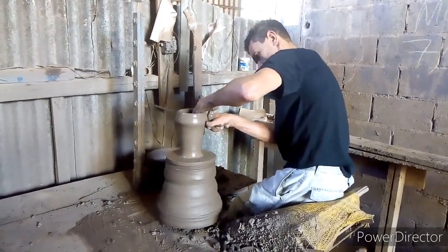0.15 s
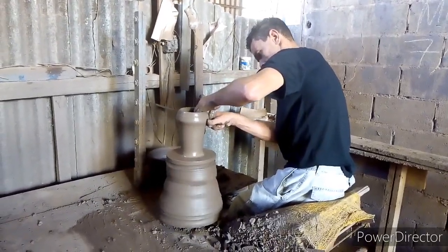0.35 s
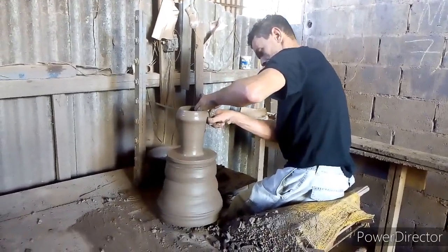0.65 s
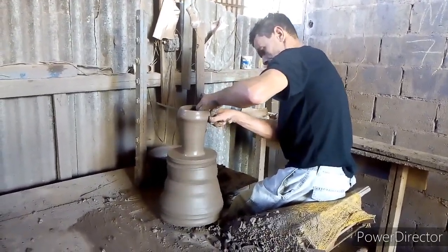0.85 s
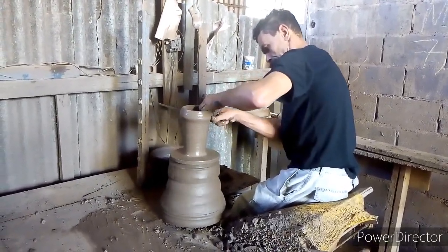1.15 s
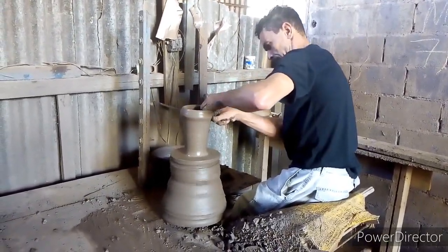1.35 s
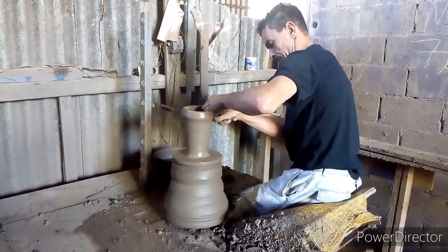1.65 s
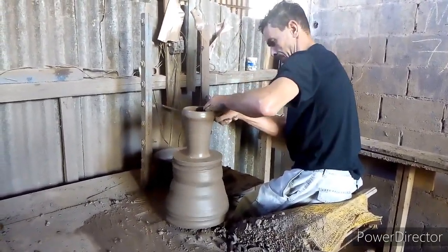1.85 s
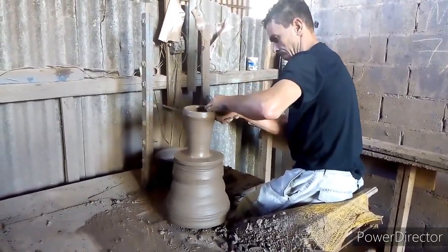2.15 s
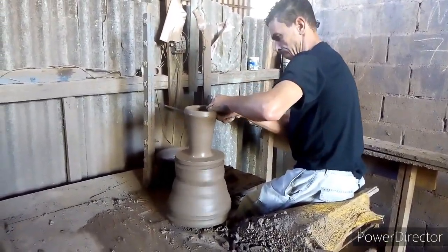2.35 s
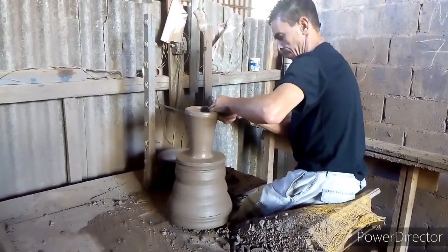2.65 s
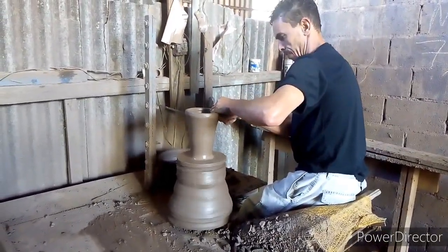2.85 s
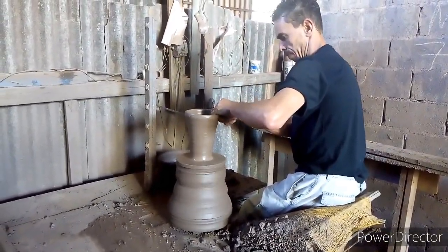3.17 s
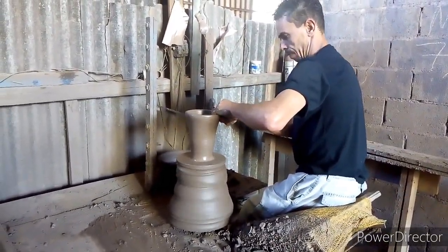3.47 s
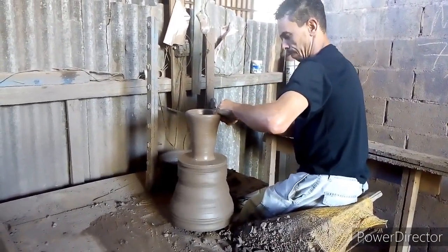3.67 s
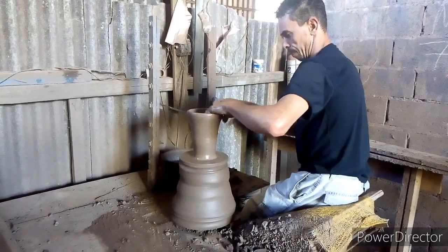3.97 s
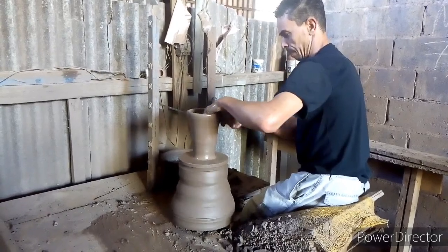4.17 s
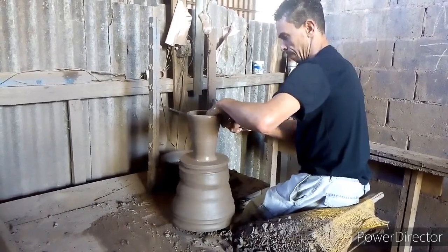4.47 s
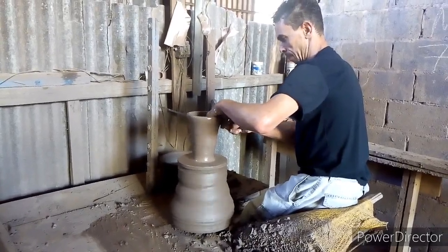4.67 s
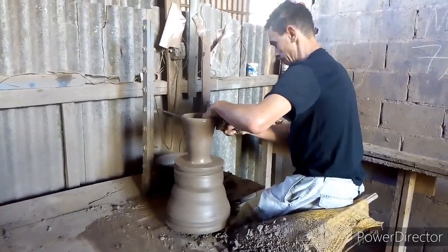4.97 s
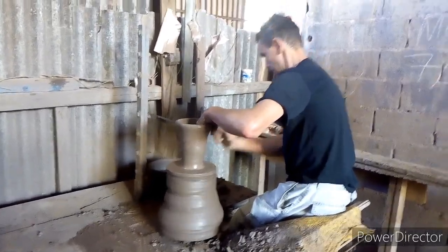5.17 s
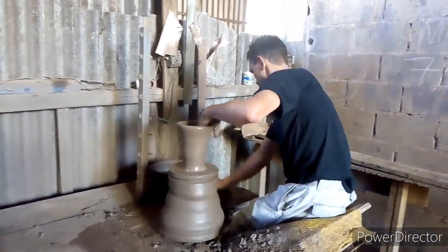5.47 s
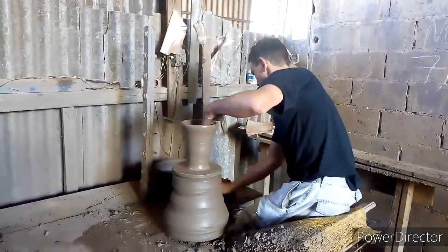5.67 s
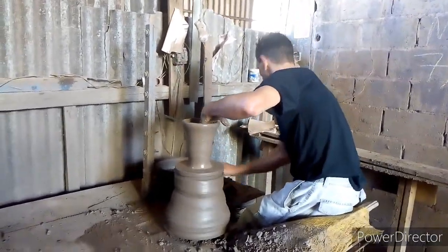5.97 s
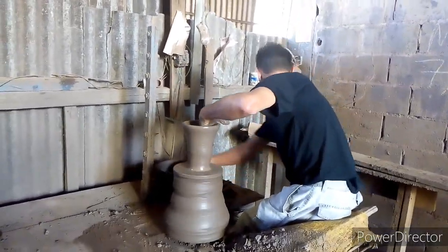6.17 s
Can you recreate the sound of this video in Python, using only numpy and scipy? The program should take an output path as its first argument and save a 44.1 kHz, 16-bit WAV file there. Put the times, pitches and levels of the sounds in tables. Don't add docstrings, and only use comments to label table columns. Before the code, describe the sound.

From 0 s an electric potter's wheel is already running at constant speed and never stops. Its gears make a dense, nasal whine of several fixed tones, mostly between 600 Hz and 2 kHz, pulsing gently about twice a second. A rough casing rattle buzzes with it, over a low frame hum and rumble, with thin grainy motor hiss on top. Dull soft thumps come irregularly, clearer near 0.35, 1.3, 3.8 and 4.5 s. The whine slackens slightly around 0.5, 1.4 and 2.1 s, then recovers. At about 4.5 s a short burst of knocks and metallic clanks breaks out, then eases. From 5.4 s the drive loosens: irregular clanking, stuttering and harder rattle continue to the end at about 6.3 s, with a strong thump near 5.9 s. Close phone pickup in a metal-walled shed, weighted right, the left side muffled.

```python
import sys
import numpy as np
from scipy import signal
from scipy.fft import rfft, irfft, next_fast_len
from scipy.io import wavfile
from scipy.ndimage import uniform_filter1d, map_coordinates

SR = 44100
rng = np.random.default_rng(int(sys.argv[2]) if len(sys.argv) > 2 else 0)


def wav_record(signal):
    frames = np.transpose(np.atleast_2d(signal))
    bounded = np.clip(frames, -1, 1)
    quanta = np.round(bounded * 32767).astype(np.int16)
    wavfile.write(sys.argv[1], SR, quanta)


def gain_from_db(level_db):
    decades = np.asarray(level_db, float) / 20
    return 10 ** decades


N = 278712
T = np.arange(N) / SR

MESH_HZ, SHAFT_HZ = 91.525, 29.8
PINION, RING = 8, 41
WHEEL_HZ = MESH_HZ / RING


def unit(x):
    return x / np.sqrt(np.mean(np.atleast_2d(x)[-1] ** 2) + 1e-20)


def wobble(rate):
    at = np.arange(0, N + 64, 64)
    knots = rng.standard_normal(int(N * rate / SR) + 4)
    return np.interp(np.arange(N), at, map_coordinates(knots, [at * rate / SR], order=2))


def turn(hz, lead):
    return np.cos(2 * np.pi * hz * T + lead)


def bumps(times, sizes, rise_s, fall_s):
    at = np.arange(0, N, 32)
    u = at[:, None] / SR - times
    shape = np.exp(-0.5 * (u / np.where(u < 0, rise_s, fall_s)) ** 2) @ sizes
    return np.interp(np.arange(N), at, shape)


def along(points, hz):
    f, *cols = np.transpose(points)
    return np.array([np.interp(np.log(hz + 1), np.log(f + 1), c) for c in cols])


def broad(points, hz):
    db, left_db = along(points, hz)
    return gain_from_db([db + left_db, db])


# (frequency [Hz], likeness [0-1])
LIKENESS = [(60, 1), (200, 0.89), (350, 0.8), (700, 0.75), (1200, 0.65), (1700, 0.75), (2500, 0.6),
            (3500, 0.5), (5000, 0.4), (15000, 0.05)]
# (frequency [Hz], left lead [rad])
PORT_LEAD = [(500, 0.5), (1100, -2), (1700, 1.5), (2700, 1.55), (3500, 2), (4200, 0.95), (5000, 4),
             (15000, 8)]


def at_ports(gate, colour, patchy_db):
    z = signal.stft(gate * rng.standard_normal((2, N)), nperseg=512)[2]
    patches = uniform_filter1d(rng.standard_normal(z.shape[1:]), size=3, axis=0)
    patches = uniform_filter1d(patches, size=9, axis=1)
    noise = signal.istft(z * gain_from_db(patchy_db * patches / patches.std()), nperseg=512)[1]
    m = next_fast_len(N + 8192)
    hz = np.fft.rfftfreq(m, 1 / SR)
    shared, own = rfft(noise, m)
    alike = np.clip(along(LIKENESS, hz)[0], 0, 1)
    shifted = np.exp(1j * along(PORT_LEAD, hz)[0]) * shared
    left = alike * shifted + np.sqrt(1 - alike ** 2) * own
    return unit(irfft(colour(hz) * [left, shared], m)[:, :N])


# (time [s], level [dB])
SLACK = [(0.0, -1), (1.6, -0.25), (2.1, 0), (3.1, 0), (4.4, 1), (4.55, 2.5), (4.8, 1), (5.3, -1),
         (5.42, 2.5), (5.75, 1.5), (6.32, 2.5)]


def slack_db():
    s, db = np.transpose(SLACK)
    return np.interp(T, s, db)


# (time [s], strength [dB], tilt to the treble [dB])
BLOWS = [(1.79, 1, 1), (2.18, 0.5, 4.5), (3.1, 3.5, -0.5), (4.51, 4, 0.5), (4.592, 5.5, 4.5),
         (4.94, 2, 2.5), (5.04, 1.5, 1), (5.45, 0, 4), (5.57, 3.5, 4.5), (5.65, 6, -1), (5.74, 5.5, -6.5),
         (5.831, 4.5, 4), (5.902, 8.5, -2.5), (5.992, 2.5, -5.5), (6.091, 4, -2), (6.17, 8.5, -0.5),
         (6.26, 2, -3)]
BLOW_S, BACKSWING = 0.016, 0.075


def chatter_db(grows, blow, tilt):
    s, db, tilt_db = np.transpose(BLOWS)
    size = blow * db + tilt * tilt_db
    half_turn = PINION / MESH_HZ / 2
    sag = BACKSWING * bumps(s + half_turn, size, BLOW_S, BLOW_S)
    return grows * slack_db() + bumps(s, size, BLOW_S, BLOW_S) - sag


# (time [s], loss [dB])
SLIPS = [
    (0.22, 1),
    (0.46, 12),
    (0.93, 5),
    (1.44, 13),
    (2.12, 19),
    (3.3, 9),
    (3.72, 5),
    (4.1, -10),
    (4.95, 3),
    (5.785, 20),
]
CONTACT_DB, FIRM_S, SLIP_S, REGAIN_S = 1, 0.1, 0.0092, 0.1
PARTING_S, PARTING_DB, PARTING_WIDTH_S = 5.805, -24, 0.014


def contact():
    s, db = np.transpose(SLIPS)
    firming = 0.43 * bumps(s, db, FIRM_S, SLIP_S)
    loss = 0.73 * bumps(s + 2 * SLIP_S, db, SLIP_S, REGAIN_S)
    parting = bumps(np.array([PARTING_S]), np.array([PARTING_DB]), PARTING_WIDTH_S, PARTING_WIDTH_S)
    return CONTACT_DB + firming - loss + parting


# (time [s], level below 750 Hz [dB], level above [dB])
STUTTERS = [(4.44, 6, 0), (4.52, 6, 9.5), (4.581, -1, 7.5), (4.623, 0, -4), (4.696, -6.5, 4.5),
            (4.94, -1, 2.5), (4.976, 2, 5), (5.055, 0.5, 8), (5.097, 4, 6), (5.157, -2, -2), (5.28, 0, -6),
            (5.41, -0.5, 7), (5.46, 1, 10.5), (5.49, 4, 8), (5.56, -6, 2.5), (5.584, -6.5, 5),
            (5.605, 2, -7), (5.632, -1, 7.5), (5.664, 2.5, -1), (5.684, 3, 8), (5.7, -5.5, -1),
            (5.733, 5, -4), (5.751, -3, 9), (5.77, 2, -1), (5.798, -2.5, 4.5), (5.829, 2.5, 0),
            (5.87, -5, -4), (5.914, 3, -4), (5.97, 1.5, -11), (6.01, -2, 3), (6.07, -4, -0.5),
            (6.1, 5, 3.5), (6.13, -7, -4), (6.171, 6.5, -3), (6.22, 3.5, -3), (6.263, 4.5, -1)]


def stutter_db(hz):
    s, low_db, mid_db = np.transpose(STUTTERS)
    return bumps(s, low_db if hz < 750 else mid_db, 0.0098, 0.0098)


# (frequency [Hz], right level [dB per Hz], left minus right [dB])
HISS = [(4200, -20, -1), (4700, 3, -1), (5200, 0, -1), (6000, 1, -2), (6500, -2, -1), (7000, 0, -5),
        (7900, -8, 0), (9000, -3, -2), (9900, -7, -1), (10600, -14, 0), (11400, -12, -4.5),
        (12400, -6, -9.5), (14100, -3, -21), (14700, 1, -13)]
COMB_HZ, COMB_DB = 60, 3.2


def combed(hz):
    teeth = map_coordinates(rng.standard_normal(int(SR / COMB_HZ)), [hz / COMB_HZ], order=2)
    return broad(HISS, hz) * gain_from_db(COMB_DB * teeth)


HISS_DB, HISS_GROWS = -67, 0.6


def motor():
    brush = at_ports(gain_from_db(1.2 * wobble(30)), lambda hz: combed(hz) * (hz < 10500), patchy_db=2.0)
    flutter = gain_from_db(1.3 * turn(SHAFT_HZ, 0) + 0.56 * wobble(10) + 1.2 * wobble(40))
    fan = at_ports(flutter, lambda hz: combed(hz) * (hz >= 10500), patchy_db=2.5)
    hiss_db = HISS_DB + chatter_db(HISS_GROWS, blow=0.59, tilt=0.99)
    hiss = gain_from_db(hiss_db + 5.0) * brush + gain_from_db(-59.0 + 0.42 * (hiss_db + 72.5)) * fan
    line = gain_from_db([[-92], [-82]]) * turn(7009, 0.47 * wobble(30))
    return hiss + line


# (frequency [Hz], right level [dB per Hz], left minus right [dB])
RUMBLE = [(20, -13, 5), (41, -15, -2), (58.3, -8, -7), (81, 3, -10), (109, 0, -5.5), (123, 0.5, -13.5),
          (132, -10, -5), (159, 0, -8), (198, -7.5, -5.5), (332, -10, -8.5), (448, -11, -0.5),
          (474, -24, -22), (700, -45, -11)]
# (time [s], level over the rumble [dB], feet [Hz], feet minus frame [dB])
THUMPS = [(.07, -2, 86, 8), (.18, 1, 90.5, -1), (0.35, 7, 94, -1), (.45, 0.5, 85, 6), (1.03, 2, 72, 6),
          (1.3, 6, 90.5, 5), (1.46, 3.5, 65, 3.5), (1.82, -1, 60.4, 2), (1.97, 5, 61.6, 1),
          (2.08, -3.5, 85, -8), (2.33, 2, 85, 3), (2.78, 1.5, 80, -6), (3.09, 2.5, 85, -9),
          (3.8, 9, 80.5, -3), (4.35, 3, 72, 4), (4.51, 9, 85, 0), (5.13, 1, 80, -4), (5.61, -2, 70, 6),
          (5.78, 5.5, 80, -2), (5.92, 12, 93, -3), (6.28, 3.5, 85, -2)]
THUMP_S = 0.044
RUMBLE_DB, THUMP_DB, HUM_DB = -59, -57.5, -59.5


def rumble():
    s, db, _, _ = np.transpose(THUMPS)
    noise = at_ports(gain_from_db(0.8 * wobble(7)), lambda hz: broad(RUMBLE, hz), patchy_db=1.5)
    return gain_from_db(RUMBLE_DB + 0.28 * bumps(s, db, THUMP_S, THUMP_S) + 4.5) * noise


def thumps():
    s, db, feet_hz, feet_db = np.transpose(THUMPS)
    hum = gain_from_db(HUM_DB + 2.5 * wobble(7.1))
    struck = gain_from_db(THUMP_DB) * bumps(s, gain_from_db(db), THUMP_S, THUMP_S)
    frame = (hum + struck) * turn(117.7, 0.53 * wobble(5))
    u = np.arange(-(SR // 8), SR // 8) / SR
    swell = np.exp(-0.5 * (u / (0.92 * THUMP_S)) ** 2)
    feet = np.zeros(N + SR)
    for at, hz, level in zip(s, feet_hz, db + feet_db):
        feet[round(at * SR):][:len(u)] += gain_from_db(THUMP_DB + level) * swell * np.cos(2 * np.pi * hz * u)
    return gain_from_db([[-8], [0]]) * (frame + feet[SR // 8:][:N])


# (time [s], panel [Hz], right level [dB])
CLANKS = [(4.502, 854, -44.5), (4.49, 1602, -36), (5.198, 2110, -38.5), (5.468, 2080, -40),
          (5.63, 1560, -33.5), (5.72, 2150, -36.5), (6.068, 2150, -34.5), (6.101, 2500, -41.5),
          (4.508, 2110, -35), (4.529, 4240, -43), (4.607, 3590, -51), (4.608, 2430, -48), (5.46, 830, -39),
          (5.633, 4310, -50), (5.661, 2140, -39), (5.737, 1488, -31.5), (5.764, 3960, -43.5),
          (5.811, 2130, -35), (5.83, 2467, -35), (5.896, 1570, -31.5), (5.896, 1806, -40),
          (5.9, 2490, -35.5), (5.911, 4250, -44), (5.97, 2470, -35), (5.98, 2150, -43.5),
          (5.996, 2010, -32.5), (6.078, 1750, -38.5), (6.106, 960, -39), (6.16, 1744, -37),
          (6.162, 2030, -33), (6.185, 2468, -35.5), (6.244, 2550, -41), (6.259, 2060, -34.5)]
# (frequency [Hz], left minus right [dB])
CLANK_SHADE = [(600, -14), (900, -9), (1550, -29), (2100, -28), (2500, -37), (3500, -18), (4200, -8)]
CLANK_S = 0.04
CLANK_WAVER, CLANK_GRAIN = 0.091, 0.28
LOOSE_HZ, LOOSE_LONGER = 2490, 0.97


def clanks():
    out = np.zeros((2, N + SR))
    t = np.arange(SR // 3) / SR
    for s, hz, db in CLANKS:
        loose = np.exp(-((hz - LOOSE_HZ) / 45) ** 2)
        waver = np.cumsum(rng.standard_normal(len(t))) * CLANK_WAVER * (1 - 0.45 * loose)
        u = t / (0.32 * CLANK_S * (1 + LOOSE_LONGER * loose))
        start = round((s - 0.45 * CLANK_S) * SR)
        left_db = along(CLANK_SHADE, hz)[0]
        level = gain_from_db([[db + left_db], [db]]) * gain_from_db(3.0)
        ring = np.sin(2 * np.pi * hz * t + waver + np.array([[1.2], [0]]))
        out[:, start:start + len(t)] += level * u * np.exp(1 - u) * ring
    return out[:, :N] * (1 + CLANK_GRAIN * turn(MESH_HZ, 1.7 * wobble(22)))


# (frequency [Hz], width [Hz], right level [dB], left minus right [dB])
CASING = [(354, 90, -18.5, -6.5), (452.4, 40, -20, -18.5), (596, 54, -12, -25), (657, 21, -9, -11),
          (847, 48, -9, -1.5), (933, 33, -5.5, -23), (980, 23, -16, -22), (1230, 29, -18, -9),
          (1370, 24, -5.5, -6.5), (1557, 8.5, 4.5, -23), (1620.6, 65, 4, -19), (1890, 16, -30, -19),
          (2010, 33, -15, -21), (2150, 70, -4, -11), (2310, 124, -8, -12), (2490, 47, -5.5, -11),
          (2577, 49, -11.5, -8.5), (2682, 33, -13, -11), (2880, 56, -20, -11), (2990, 41, -24.5, -15),
          (3256, 41, -18.5, -1.5), (3535, 19, -18.5, 5.5), (3650, 35, -16.5, -9), (3590, 21, -16, -3),
          (3930, 23, -17, -23), (4100, 30, -16.5, -8), (4166, 38, -16, 0.5), (4450, 45, -26, 5)]
# (frequency [Hz], right level [dB per Hz], left minus right [dB])
BED = [(420, -36.5, -1.5), (567, -25.5, 2), (726, -17.5, -16), (990, -18, -31), (1255, -19, -1),
       (1495, -13.5, -3), (1580, -8.5, -22), (2060, -9, -24), (2680, -22, -20), (2950, -25.5, -15),
       (3570, -22, -7), (3960, -24.5, -1), (4450, -26, -3.5), (5060, -43, 1.5)]


def casing(hz, lo_hz, hi_hz):
    power = broad(BED, hz) ** 2
    for centre, width, db, left_db in CASING:
        power += gain_from_db([[db + left_db], [db]]) ** 2 / (1 + ((hz - centre) / (0.65 * width)) ** 2) ** 2
    return np.sqrt(power) * ((hz >= lo_hz) & (hz < hi_hz))


KNOCK_DB, RATTLE_DB, HIGH_DB = -47, -45.5, -55
KNOCK_GROWS, RATTLE_GROWS, HIGH_GROWS = 0.6, 0.48, 0.65


def backlash():
    knock_db = KNOCK_DB + chatter_db(KNOCK_GROWS, blow=0.79, tilt=-0.2)
    rattle_db = RATTLE_DB + chatter_db(RATTLE_GROWS, blow=0.87, tilt=-0.2)
    high_db = HIGH_DB + chatter_db(HIGH_GROWS, blow=0.88, tilt=0.41)
    bursts = gain_from_db(0.53 * turn(MESH_HZ, 0) + 0.13 * turn(MESH_HZ / PINION, 0) + 1.04 * wobble(14))
    runout = gain_from_db(2 * turn(WHEEL_HZ, -0.77))

    def part(lo_hz, hi_hz, gate):
        return at_ports(bursts * gate, lambda hz: casing(hz, lo_hz, hi_hz), patchy_db=1.23)

    drone = gain_from_db(-56.0) * part(100, 520, 1)
    low_knock = gain_from_db(0.73 * stutter_db(600)) * part(520, 750, gain_from_db(0.77 * wobble(60)))
    mid_knock = gain_from_db(3.0 + 0.97 * stutter_db(900)) * part(750, 1150, gain_from_db(0.31 * wobble(60)))
    knock = gain_from_db(knock_db - 4.5) * (low_knock + mid_knock)
    core = gain_from_db(-40.5 + 0.37 * (rattle_db + 50.0) + 0.088 * contact()) * part(1150, 1880, runout)
    rattle = gain_from_db(rattle_db + 4) * part(1880, 2770, 1)
    high = gain_from_db(high_db + 4.5) * part(2770, 6000, 1)
    return drone + knock + core + rattle + high


# (order of the mesh rate, right level [dB], left minus right [dB], left lead [rad])
WHINE = [(4, -76.2, -4.3, -0.1), (5, -64.7, -7.4, 0.2), (6, -55.3, -8.6, 0.8), (7, -43.2, -4.7, -0.2),
         (8, -59.5, -11.4, 0), (9, -48.4, -16.4, -0.5), (10, -46.0, -13.5, 0.1), (11, -62.3, -6.4, 1.5),
         (12, -68.2, -1.5, 0.5), (13, -58.9, -12.5, 0), (14, -63.5, -11.8, 0), (15, -43.1, -14.9, -0.5),
         (16, -61.3, -27.3, 0.6), (17, -41.2, -20.2, 0.9), (18, -37.8, -16.6, 1.8), (19, -61.0, -5.9, 1.0),
         (20, -50.1, -25.1, 1.5), (21, -57.5, -22.6, 1.0), (22, -54.5, -21.7, 1.0),
         (23, -51.3, -24.1, -1.1), (24, -55.9, -20.0, -1.1), (27, -56.9, -30.0, 1.1),
         (28, -64.1, -4.3, 1.1), (33, -70.4, -21.1, 2.4), (36, -72.7, -12.1, 2.7), (38, -66.4, -15.3, 2.4)]
# (order of the mesh rate, order of the shaft, right level [dB], left minus right [dB])
FLANKS = [(7, -2, -63, -6), (7, -1, -56, -6), (7, 1, -55.5, -4), (7, 2, -59, -6), (8, 1, -66, -7),
          (9, 2, -59.5, -9), (13, 1, -66, -12), (14, 1, -65, -19), (15, -1, -58, -7), (16, -1, -63, -17),
          (16, 1, -61, -21), (17, -1, -58, -21), (18, -2, -56, -14), (18, 2, -54, -18), (20, -1, -55, -30),
          (20, 1, -63, -26), (21, 1, -60, -27), (22, 1, -58.5, -25), (23, 1, -52.5, -11), (24, 1, -59, -15),
          (28, -1, -65, -14)]
THROB = {6: (.14, -1.7), 7: (.14, 1.9), 8: (.37, 2.8), 9: (.21, -1.4), 13: (.11, .2), 14: (.25, -1.7),
         15: (.54, -1.1), 16: (.12, -.6), 17: (.35, -.7), 23: (.13, -2.8), 38: (.17, -.5)}
NOTCH = 0.3
FLICKER_DB, FLICKER_GROWS = 0.5, 0.4


def whine():
    rocking = 0.045 * turn(WHEEL_HZ, 0.83) + 0.035 * wobble(1.19) + 0.021 * wobble(25)
    angle = 2 * np.pi * MESH_HZ * T + rocking
    out = np.zeros((2, N))
    contact_db = contact()
    start, beat = rng.uniform(0, 2 * np.pi, (2, 64))
    flicker_db = FLICKER_DB + FLICKER_GROWS * np.maximum(slack_db(), 0)
    for order, db, left_db, lead in WHINE:
        depth, throb_lead = THROB.get(order, (0, 0))
        firm = np.exp(-((order - 18) / 2.6) ** 2)
        throb = turn(WHEEL_HZ, throb_lead) - NOTCH * turn(2 * WHEEL_HZ, 2 * throb_lead)
        size = gain_from_db(db + 0.33 * firm * contact_db + 0.74 * wobble(3.907) + 0.42 * wobble(8))
        size *= 1 + 0.88 * depth * throb
        if order < 12:
            size *= gain_from_db(flicker_db * wobble(28) + 0.56 * wobble(110) + 0.89 * stutter_db(order * MESH_HZ))
        phase = round(order) * angle + start[round(order)]
        out += np.sqrt(2) * size * [gain_from_db(left_db) * np.cos(phase + lead), np.cos(phase)]
    for order, shaft_order, db, left_db in FLANKS:
        shaft = 2 * np.pi * SHAFT_HZ * T + beat[round(order)]
        phase = round(order) * angle + start[round(order)] + round(shaft_order) * shaft
        out += np.sqrt(2) * gain_from_db(db + 0.31 * wobble(5.04)) * gain_from_db([[left_db], [0]]) * np.cos(phase)
    return out


def scene():
    return motor() + rumble() + thumps() + clanks() + backlash() + whine()


# (frequency [Hz], step over the right port's mean level [dB])
GRAIN = [(1500, -32), (3000, -27), (4400, -17), (4900, -4), (5400, 1), (5900, -6), (6400, 0), (7100, -6),
         (8000, 6), (8700, -5), (9500, 2), (10000, 4.5), (10400, 11), (10900, 6.5), (11500, 8.5),
         (12000, -1), (12600, -3), (13200, 2), (14100, -4), (14600, -10), (15100, -9), (15350, -1)]
FRAME, GRID = 1024, 507
STARVED, STARVED_DB = 0.1, 14
JOINT, JOINT_TOP_HZ = 0.65, 10800


def phone_grain(x, scatter_db):
    n, k = np.arange(2 * FRAME)[:, None], np.arange(FRAME)
    window = np.sin(np.pi * (n + 0.5) / (2 * FRAME))
    basis = window * np.cos(np.pi / FRAME * (n + 0.5 + FRAME / 2) * (k + 0.5)) * np.sqrt(2 / FRAME)
    blocks = np.pad(x, ((0, 0), (2 * FRAME - GRID, 3 * FRAME)))
    blocks = blocks[:, :blocks.shape[1] // FRAME * FRAME].reshape(2, -1, FRAME)
    c = np.concatenate([blocks[:, :-1], blocks[:, 1:]], axis=2) @ basis
    hz = k * SR / (2 * FRAME)
    grain_db = along(GRAIN, hz)[0]
    count, bands = c.shape[1], FRAME // 16

    mean = np.sqrt(uniform_filter1d(np.mean(c[1] ** 2, axis=0), size=24))
    scatter = np.repeat(rng.standard_normal((1, count, bands)), 16, axis=2)
    starved = np.repeat(rng.random((2, count, bands)) < STARVED, 16, axis=2)
    starved = (starved | np.roll(starved, 1, axis=1)) & (grain_db > -6.5)
    joint = starved.any(axis=0) | np.repeat(rng.random((count, bands)) < JOINT, 16, axis=1)
    joint &= hz < JOINT_TOP_HZ

    def swap(v):
        return np.where(joint, [v[0] + v[1], v[0] - v[1]] / np.sqrt(2), v)

    step = mean * gain_from_db(grain_db + scatter_db * scatter + STARVED_DB * starved * joint) + 1e-12
    treble = (c[1] / mean)[:, FRAME // 4:FRAME // 2]
    loudness = np.mean(treble ** 2, axis=1, keepdims=True)
    step *= loudness ** 0.35 + 1e-6
    mixed = swap(c)
    rounded = swap(np.sign(mixed) * np.floor(np.abs(mixed) / step + 0.4) * step)
    frames = (rounded + gain_from_db(-48) * (c - rounded)) @ basis.T
    out = frames[:, :-1, FRAME:] + frames[:, 1:, :FRAME]
    return out.reshape(2, -1)[:, FRAME - GRID:][:, :N]


def roll_off(x):
    return signal.sosfilt(signal.butter(12, 16630, fs=SR, output="sos"), x)


def record(dry):
    kept = irfft(rfft(dry) * (np.fft.rfftfreq(N, 1 / SR) < 15550), N)
    mix = phone_grain(kept, scatter_db=2.8)
    return roll_off(mix)


dry = scene()
out = record(dry)
wav_record(out)
```